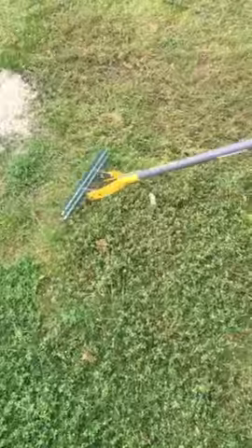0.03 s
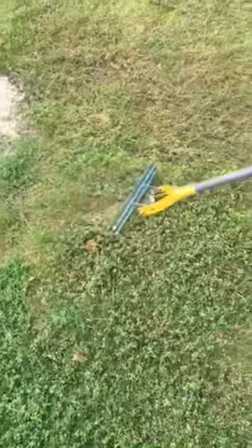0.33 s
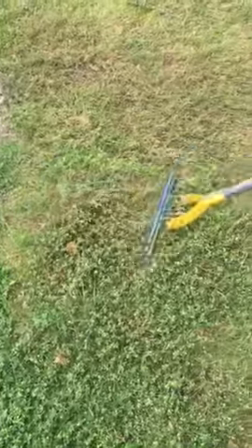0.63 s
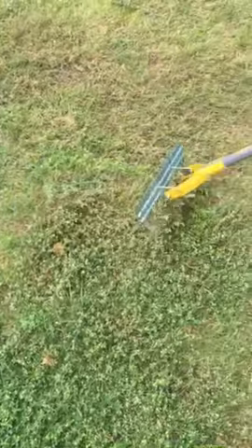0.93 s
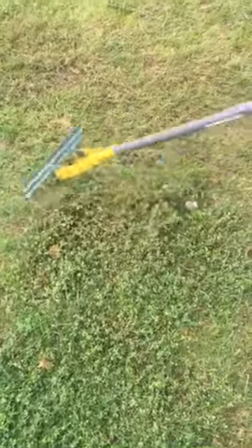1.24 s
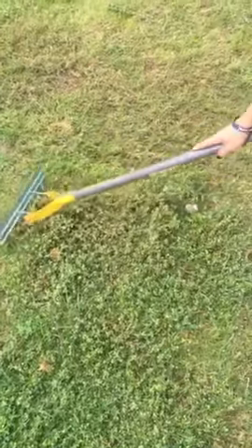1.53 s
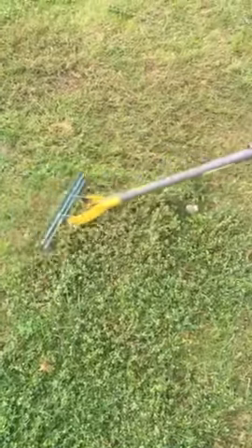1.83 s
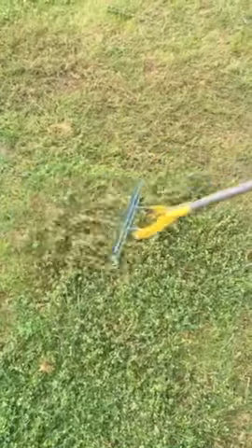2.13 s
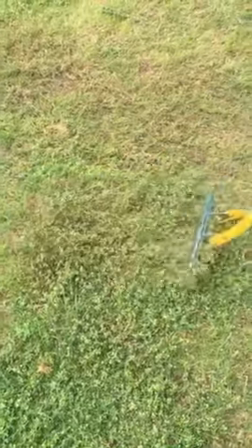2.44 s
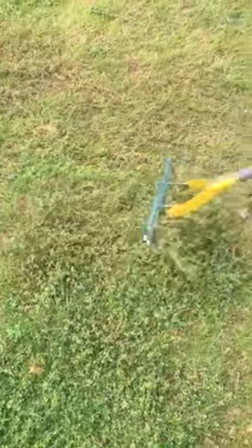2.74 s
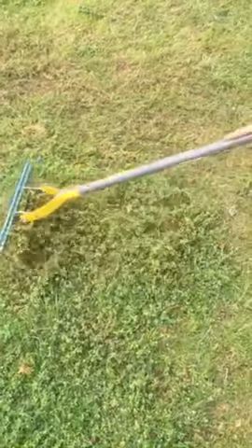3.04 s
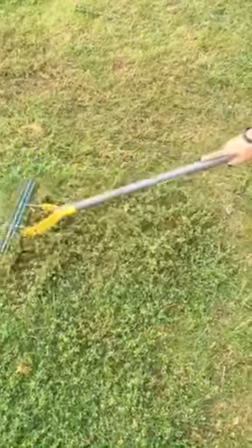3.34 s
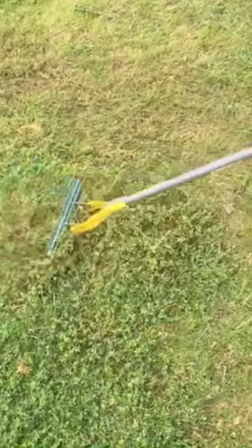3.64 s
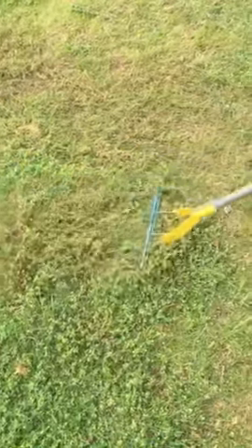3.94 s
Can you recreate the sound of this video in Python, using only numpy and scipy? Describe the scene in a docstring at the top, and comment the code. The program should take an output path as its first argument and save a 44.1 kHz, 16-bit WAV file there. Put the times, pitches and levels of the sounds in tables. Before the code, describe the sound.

A rake scratches through grass twice in the first second, its tines snagging, ringing lightly and scraping soil as dry stalks crack. Small birds chirp faintly from 1 to 1.6 seconds over a soft outdoor hiss. A longer stroke follows until about 2.7 seconds, when the birds return. The fourth stroke runs from about 3.3 to 4 seconds, as wind bumping the microphone reaches its strongest.

```python
"""Over a soft outdoor hiss, wind bumps the microphone and a rake is dragged twice through a lawn.
Grass and stalks catch on its tines (the teeth) and slip off, which makes them ring; pressed down,
the tines also scrape the soil. From 1 s small birds chirp in the trees, and near 1.6 s a third
stroke begins. The birds return as it fades. The fourth stroke starts near 3.2 s, in the strongest gusts."""
import sys
import numpy as np
from scipy import signal
from scipy.fft import rfft, irfft
from scipy.io import wavfile
from scipy.ndimage import uniform_filter1d

SR = 44100
rng = np.random.default_rng(int(sys.argv[2]) if len(sys.argv) > 2 else 0)


def put_to_file(sound):
    """Save the sound as 16-bit audio at rate SR, in the file named by the first command-line argument."""
    columns = np.atleast_2d(sound).T  # one column per channel
    safe = np.clip(columns, -1, 1)
    whole_steps = np.round(safe * 32767)
    wavfile.write(sys.argv[1], SR, whole_steps.astype(np.int16))


N = 176400  # 4 seconds

# The tone of tearing grass and stalks: pitch_hz, level_db
GRASS_TONE = [(200, -54), (500, -5), (1200, -8), (2300, -0.5), (3500, -1), (5000, -2), (7000, 1.5),
              (10000, 0), (13000, 3), (17000, -1.5)]


def amp(db):
    """Turn decibels into a number to multiply a sound by."""
    return 10 ** (np.asarray(db) / 20)


def unit(x):
    """Scale a signal to an average strength (rms) of 1."""
    return x / np.sqrt(np.mean(x ** 2))


def noise():
    """White noise: an even hiss."""
    return rng.standard_normal(N)


def wander(per_s):
    """A curve that glides to a new random value per_s times a second; its typical size is 1."""
    hold = max(int(SR / per_s), 2)
    return unit(uniform_filter1d(noise()[np.arange(N) // hold], hold))


def burst(t, start_s, decay_s):
    """A level that jumps up, then dies away."""
    return (t >= start_s) * np.exp(-np.maximum(t - start_s, 0) / decay_s)


def convolve(x, response):
    """Give a sound the ring or echo of a response, scaled to an energy of 1."""
    return signal.fftconvolve(x, response / np.sqrt(np.sum(np.abs(response) ** 2)))[:N]


def colour(x, points, size=4096):
    """Shape a sound's lows and highs along (pitch_hz, level_db) points."""
    hz, db = np.array(points).T
    grid_hz = np.arange(size // 2 + 1) * SR / size + 1
    gains = amp(np.interp(np.log(grid_hz), np.log(hz), db))
    # Build the filter so that it never sounds before its input does.
    cepstrum = irfft(np.log(gains))
    cepstrum[1:size // 2] *= 2
    cepstrum[size // 2 + 1:] = 0
    return convolve(x, irfft(np.exp(rfft(cepstrum))))


def background():
    """A soft, distant outdoor hiss whose level sways a little."""
    # The tone of the hiss: pitch_hz, level_db
    air_tone = [(25, -9), (100, 9), (250, 7), (550, 1), (1250, 1.5), (2000, -4), (4000, -7.5), (8000, -13),
                (17000, -15.5)]
    return amp(-63.5 + .5 * wander(per_s=2.52)) * unit(colour(noise(), air_tone))


def birds(t):
    """Short arched and sliding whistles, some warbled and raspy, scattered by the trees."""
    # Chirps: start_s, length_s, first_hz, middle_hz, last_hz, level_db, warble_amount (0 to 1)
    notes = [(1.01, 0.027, 4500, 4540, 4280, -45, 0.12), (1.084, 0.021, 3630, 3980, 4380, -44.5, 0.14),
             (1.268, 0.046, 6630, 6340, 6250, -57.5, 0.7), (1.302, 0.056, 4200, 4220, 3330, -46.5, 1),
             (1.31, 0.031, 4400, 5040, 4570, -52, 0.1), (1.351, 0.052, 3450, 3543, 3760, -43.5, 0.4),
             (1.375, 0.067, 4200, 3500, 2750, -45.5, 1), (1.475, 0.1, 7330, 6800, 6350, -57, 1),
             (1.535, 0.066, 3910, 4600, 4140, -47, 0.26), (1.625, 0.038, 3530, 4010, 4170, -44, 0.1),
             (2.61, 0.055, 4550, 4500, 4140, -46.5, 0.1), (2.69, 0.02, 3760, 4060, 4300, -43, 0.2),
             (2.9, 0.054, 6850, 6520, 6580, -52, 0.04), (2.917, 0.021, 5540, 6050, 5830, -52, 0.2),
             (2.992, 0.053, 6730, 6500, 6400, -66, .1), (3.26, 0.033, 6450, 6700, 6500, -62, 0.3),
             (3.287, 0.059, 4850, 4360, 3530, -50, 0.9), (3.336, 0.052, 3550, 3540, 3640, -48, 0.26),
             (3.356, 0.067, 4500, 3600, 2870, -46.5, 0.95)]
    warble_hz, warble_depth, rasp_db = 197, 0.073, 2
    warble = np.sin(2 * np.pi * np.cumsum(warble_hz * (1 + 0.38 * wander(per_s=60))) / SR)
    warble += .3 * wander(per_s=500)  # roughens the warble
    song = np.zeros(N)
    for start_s, length_s, first_hz, middle_hz, last_hz, level_db, warble_amount in notes:
        on = (t >= start_s) & (t < start_s + length_s)
        progress = (t[on] - start_s) / length_s
        arch = np.polyfit([0, .5, 1], [first_hz, middle_hz, last_hz], 2)
        hz = np.polyval(arch, progress) * (1 + warble_depth * warble_amount * warble[on])
        song[on] += amp(level_db) * np.sin(np.pi * progress) * np.sin(2 * np.pi * np.cumsum(hz) / SR)
    song *= amp(rasp_db * wander(per_s=250))
    tree_echo = noise() * burst(t, start_s=0.018, decay_s=0.19 / np.log(1000))  # falls 60 dB in 0.19 s
    return amp(-2.5) * song + amp(-7.5) * convolve(song, tree_echo)


def wind(t):
    """A fluttering rumble, with short thuds where swirls of air hit the microphone."""
    # The rise and fall of the gusts: time_s, level_db
    gusts = [(0.082, -59), (0.088, -35.5), (.2, -53.5), (.25, -60), (.45, -50.5), (.6, -53.5), (.9, -60),
             (1.1, -51.5), (1.25, -70.5), (1.4, -51), (1.5, -37.5), (1.58, -63), (1.65, -45), (1.72, -63),
             (1.78, -45.5), (1.98, -53.5), (2.15, -47), (2.26, -43), (2.37, -51), (2.47, -45), (2.77, -54),
             (3.0, -47.5), (3.082, -50), (3.2, -40), (3.31, -37.5), (3.4, -26), (3.54, -33), (3.62, -28.5),
             (3.68, -37), (3.85, -38), (4.0, -54.5)]
    # The tone of the rumble: pitch_hz, level_db
    rumble_tone = [(20, -43), (32, -8), (48, -1), (70, 3), (120, -6.5), (200, -12.5), (300, -22.5),
                   (500, -36.5), (1200, -93), (4000, -114)]
    # Swirls of air: centre_s, length_s, level_db, upper_edge_hz
    swirls = [(0.128, 0.012, -28.5, 181), (.2, 0.018, -39, 172), (1.493, 0.013, -33.5, 270),
              (1.524, 0.015, -33, 105), (1.769, 0.012, -31.5, 79.6), (1.831, 0.0093, -31.5, 131),
              (2.259, 0.018, -37.5, 129), (2.671, 0.024, -42, 160), (3.008, 0.022, -34.5, 103),
              (3.144, 0.026, -33.5, 161), (3.243, 0.01, -24.5, 185), (3.266, 0.02, -28.5, 170),
              (3.323, 0.0055, -25.5, 284), (3.331, 0.0054, -19, 324), (3.364, 0.011, -22.5, 286),
              (3.375, 0.0056, -19.5, 337), (3.429, 0.008, -33, 330), (3.476, 0.0068, -21.5, 294),
              (3.506, 0.016, -26, 130), (3.57, 0.0066, -22.5, 373), (3.574, 0.0028, -11.5, 560),
              (3.582, 0.0052, -21.5, 241), (3.591, 0.0089, -18.5, 120), (3.599, 0.014, -29, 360),
              (3.716, 0.0049, -28.5, 216)]
    low_edge_hz, steepness = 59.4, 1.47
    gust_db = np.interp(t, *np.array(gusts).T)
    out = unit(colour(noise(), rumble_tone)) * amp(gust_db + 2 * wander(per_s=25.14))
    hz = np.arange(N // 2 + 1) * SR / N
    for centre_s, length_s, level_db, upper_edge_hz in swirls:
        band = hz ** 2 / (hz ** 2 + low_edge_hz ** 2) * np.exp(-(hz / upper_edge_hz) ** steepness)
        swell = np.exp(-2 * np.minimum(((t - centre_s) / length_s) ** 2, 20))
        thud = irfft(rfft(noise() * swell) * band, N)
        out += amp(level_db) * thud * np.sqrt(np.sum(swell ** 2) / np.sum(thud ** 2))
    return out


def stalks(t):
    """Dry stalks break, each with one sharp crack."""
    # Breaking stalks: start_s, level_db
    cracks = [(.3183, -29), (0.5907, -19.5), (0.606, -26), (0.7701, -30), (1.4542, -44.5), (2.0918, -25.5),
              (2.257, -25), (2.5244, -27.5)]
    loudness = sum(amp(level_db) * burst(t, start_s, decay_s=0.00077) for start_s, level_db in cracks)
    return colour(noise() * loudness, GRASS_TONE)


def friction():
    """A fine rustle plus countless tiny catches, a few much stronger than the rest."""
    catches_per_s, spread_db = 1500, 3
    sizes = amp(spread_db * np.minimum(rng.exponential(size=N), 6)) * np.sign(noise())
    catches = sizes * (rng.random(N) < catches_per_s / SR)
    return amp(-5) * unit(catches) + amp(-4.5) * noise()


def slips():
    """Tines slip off tufts at random: each time the drag jumps, then quickly falls back."""
    slips_per_s, decay_s = 130, 0.00076
    kicks = (rng.random(N) < slips_per_s / SR) * rng.uniform(0, 1.32, N)
    jumps = signal.lfilter([1], [1, -np.exp(-1 / (decay_s * SR))], kicks)
    return unit(1 + amp(-3.5) * jumps)


def rake_forces(t):
    """How hard the rake drags on the grass and presses on the soil as it shakes, slips and snags."""
    # The four pulls of the rake: time_s, level_db, soil_db (added to level_db for the soil)
    stroke_1 = [(.08, -65, 3), (.087, -45.5, -1), (.164, -38, -9), (.282, -41.5, -5.5), (.296, -50, -6),
                (.33, -38.5, 1), (.426, -34, -11), (.458, -39.5, 0.5), (.572, -38, -9), (.596, -36.5, -6.5),
                (.646, -34, -0.5), (.706, -68.5, 3)]
    stroke_2 = [(.706, -61, 3), (.735, -58, -15), (.765, -49.5, -1), (.79, -50, -0.5), (.834, -55.5, -4.5),
                (.938, -39.5, -7.5), (0.996, -37, -13.5), (1.06, -56.5, -11), (1.15, -82, 7)]
    stroke_3 = [(1.56, -71, -3), (1.615, -62, -1), (1.64, -52.5, -11), (1.685, -68.5, 5), (1.716, -62, -5),
                (1.726, -50.5, 1), (1.755, -56, 2), (1.80, -44.5, -1.5), (1.85, -42.5, -4.5),
                (1.942, -35, -7), (1.985, -44.5, 2.5), (2.04, -47, -6), (2.096, -33, -9), (2.128, -43.5, 0),
                (2.15, -36, -6), (2.265, -35, -2.5), (2.34, -38.5, -8.5), (2.454, -35.5, -3.5),
                (2.51, -41.5, -10.5), (2.676, -43.5, -33), (2.748, -64.5, -20), (2.85, -77, -13)]
    stroke_4 = [(3.22, -75, -18), (3.29, -57, -29), (3.36, -55.5, -23), (3.385, -71, -18),
                (3.441, -57, -11), (3.51, -38, -10.5), (3.556, -42.5, -6), (3.64, -40, -5),
                (3.73, -43.5, -9.5), (3.765, -38.5, -5.5), (3.89, -36, -6.5), (3.96, -42.5, -4.5),
                (4.0, -38.5, -25)]
    # A tine snags and springs free: start_s, level_db, soil_db (added likewise)
    snaps = [(.1642, -38, -5), (0.292, -27.5, -9), (0.3021, -25, 0), (0.317, -31.5, 2.5), (.3473, -37, -10),
             (0.4533, -33, -12), (0.478, -31.5, 0), (0.6074, -36, -1), (0.636, -29, -5), (0.64, -33, 5.5),
             (0.67, -38, -14), (0.7335, -44.5, -8), (0.7706, -29.5, -2.5), (0.8084, -40.5, -21),
             (0.898, -35, -3.5), (0.9462, -27.5, -20), (1.72, -47, -5), (1.7935, -41, -8),
             (1.8236, -36, -2), (1.897, -33, -16), (1.9385, -28.5, -1), (1.9448, -25.5, -5.5),
             (2.001, -33, -15), (2.0557, -33.5, -3), (2.0717, -27, -1), (2.098, -31, -13), (2.111, -34, 5),
             (2.1207, -35.5, 11.5), (2.1443, -37, 4.5), (2.2656, -31.5, 0), (2.276, -32.5, 2),
             (2.3736, -27.5, -9), (2.493, -28.5, -14), (2.5215, -42, -21), (2.5648, -26.5, -15),
             (2.65, -34, -25), (3.4706, -35.5, -2), (3.5203, -31, -1.5), (3.6418, -26, -26),
             (3.7005, -32, -23), (3.747, -30, -8), (3.766, -30.5, -1), (3.8692, -35.5, 3),
             (3.9816, -34, -20)]
    drag, press = np.zeros(N), np.zeros(N)
    for stroke in (stroke_1, stroke_2, stroke_3, stroke_4):
        time_s, level_db, soil_db = np.array(stroke).T
        pull = amp(np.interp(t, time_s, level_db)) * (t >= time_s[0]) * (t < time_s[-1])
        drag += pull
        press += pull * amp(np.interp(t, time_s, soil_db))
    shake, slip = wander(per_s=110), slips()
    drag *= slip * amp(0.64 * shake)
    press *= slip * amp(1.5 * shake)
    for start_s, level_db, soil_db in snaps:
        snap = amp(level_db) * burst(t, start_s, decay_s=0.0036)
        drag = np.hypot(drag, snap)  # adds their energies
        press = np.hypot(press, snap * amp(soil_db))
    return drag, press


def ring(force, tones, t, size=2048):
    """Ringing tones that swell, fade and shift in pitch as different tines catch and bend."""
    swell_db, drift_hz = 3, 28
    age, out, energy = t[:size], 0, 0
    for k, (pitch_hz, width_hz, level_db) in enumerate(tones):
        fall = np.pi * width_hz * age / np.sqrt(np.sqrt(2) - 1)  # a wider tone dies sooner
        weight = (-1) ** k * amp(level_db) * np.sqrt(width_hz)
        push = force * amp(swell_db * wander(per_s=35))
        tone = convolve(push, fall * np.exp(-fall + 2j * np.pi * pitch_hz * age))
        bend = np.exp(2j * np.pi * np.cumsum(drift_hz * wander(per_s=22)) / SR)
        out += weight * np.real(tone * bend)
        energy += weight ** 2 / 2
    return out / np.sqrt(energy)


def rake(t):
    """Dragging rings the tines and tears the grass; pressing scrapes the soil and rings the rake's head."""
    # The ringing of the tines: pitch_hz, width_hz, level_db
    tine_tones = [(2780, 170, -1), (2960, 170, 0), (3700, 130, -1), (3880, 160, 0), (4150, 200, -3),
                  (4400, 140, -5), (4750, 250, -9), (5620, 150, -3), (6040, 130, 2), (6340, 150, -4),
                  (6950, 250, -7), (7510, 170, 0), (8550, 280, -6), (8880, 220, -3), (9490, 210, 0),
                  (10620, 160, -3), (11300, 190, 0), (11830, 150, -2), (12520, 190, 0), (14130, 180, -3),
                  (14900, 220, -4), (16850, 220, -3)]
    # The lower ringing of the rake's head: pitch_hz, width_hz, level_db
    head_tones = [(633, 142, -2.5), (860, 213, -2), (1122, 177, -3.5), (1377, 140, 0), (1649, 88, 4),
                  (1830, 110, 1.5), (2023, 85, 0.5), (2480, 130, -0.5)]
    # Tines that spring free ring a little longer: pitch_hz, width_hz, level_db
    free_tones = [(3716, 35, 0), (6065, 35, 0), (9490, 40, -3)]
    # The tone of scraped soil: pitch_hz, level_db
    soil_tone = [(150, -49), (400, 3.5), (650, -13), (1000, 11), (1500, -7), (2200, 1.5), (4000, 17),
                 (8000, -6), (17000, -5.5)]
    drag, press = rake_forces(t)
    tines = amp(-3) * ring(drag * friction(), tine_tones, t)
    grass = amp(-2) * colour(drag * friction(), GRASS_TONE)
    head = amp(-7) * ring(press * friction(), head_tones, t)
    soil = amp(-5.5) * colour(press * friction(), soil_tone)
    lingering = amp(-13.5) * ring(drag * friction(), free_tones, t, size=4096)
    return tines + grass + head + soil + lingering


def scene():
    """Rake, stalks, wind, birds and outdoor hiss at one microphone."""
    t = np.arange(N) / SR
    return (rake(t) + stalks(t) + wind(t) + birds(t) + background())[None]


def record(dry):
    """The sound opens after a moment of near silence; the very highest treble is cut away."""
    start_s, top_hz = 0.0844, 17150
    opening = np.where(np.arange(N) / SR < start_s, amp(-47), 1)
    treble_cut = signal.ellip(10, .2, 80, top_hz, fs=SR, output="sos")
    return signal.sosfilt(treble_cut, dry * opening)


dry = scene()
out = record(dry)
put_to_file(out)
```